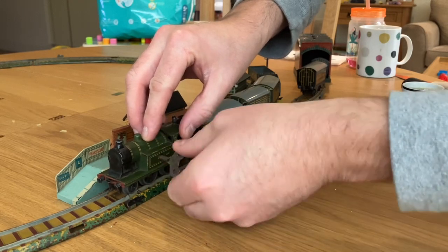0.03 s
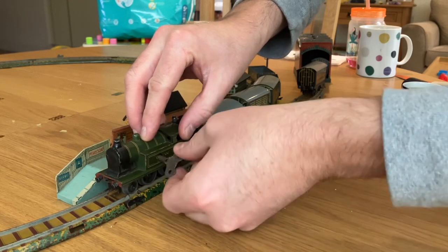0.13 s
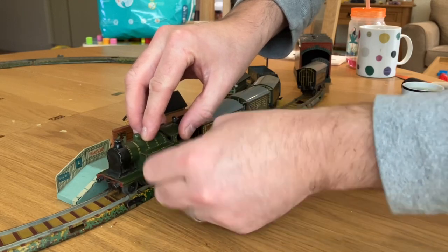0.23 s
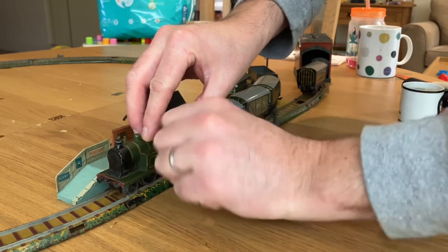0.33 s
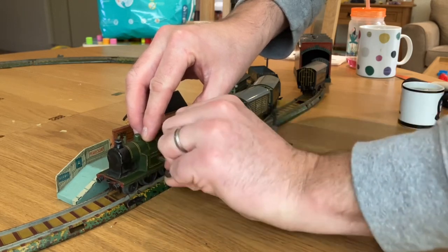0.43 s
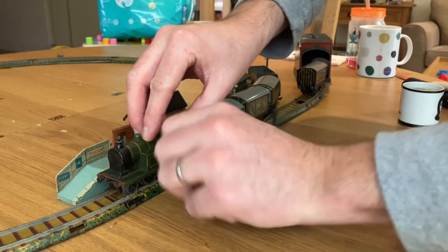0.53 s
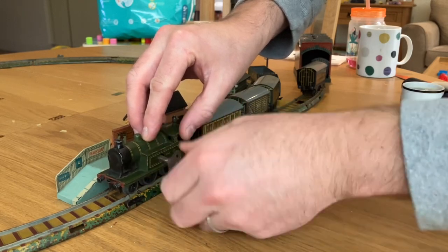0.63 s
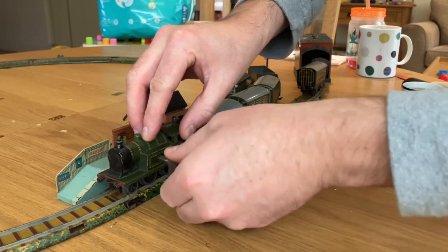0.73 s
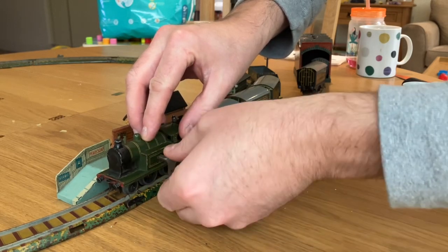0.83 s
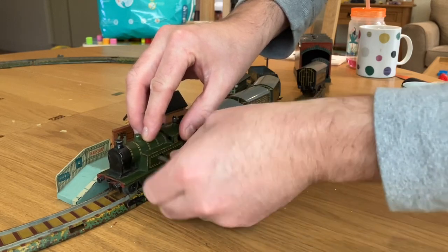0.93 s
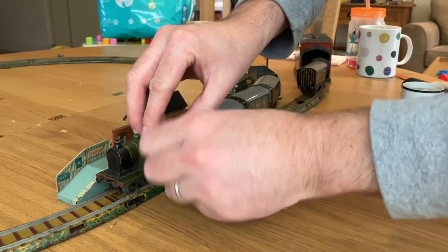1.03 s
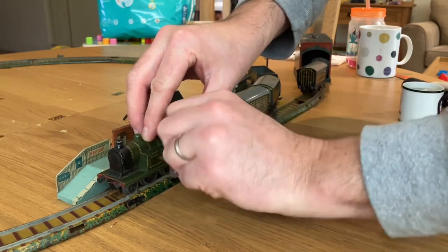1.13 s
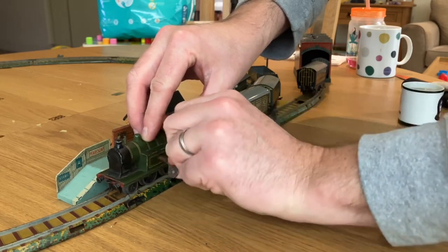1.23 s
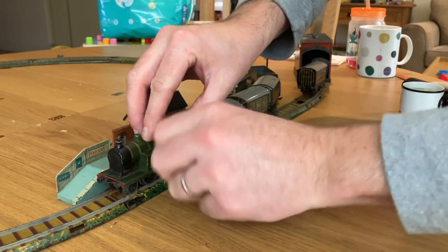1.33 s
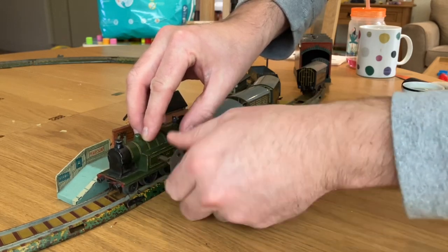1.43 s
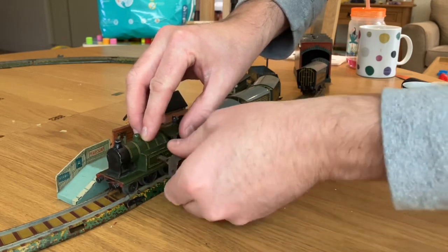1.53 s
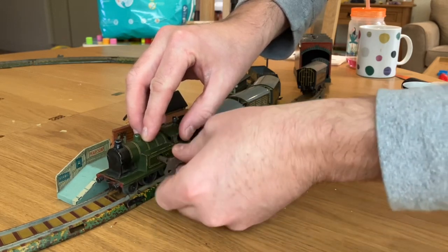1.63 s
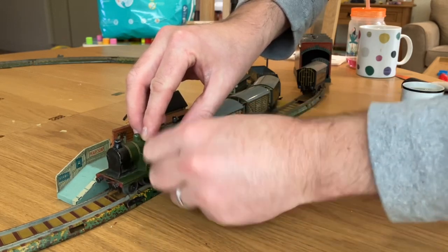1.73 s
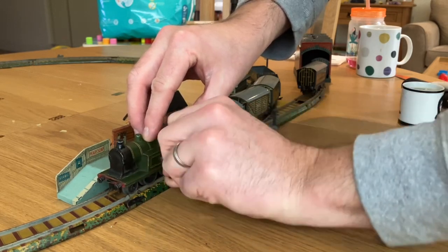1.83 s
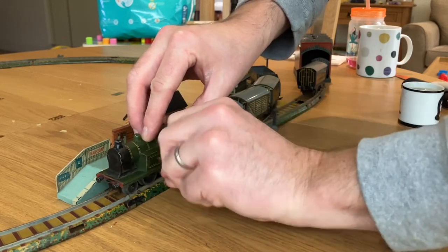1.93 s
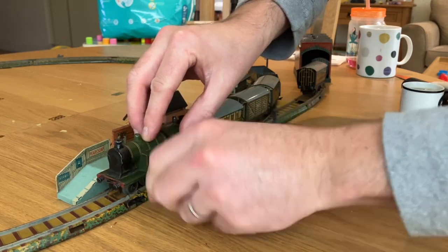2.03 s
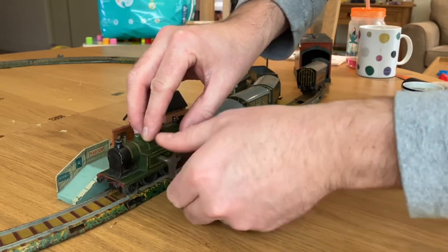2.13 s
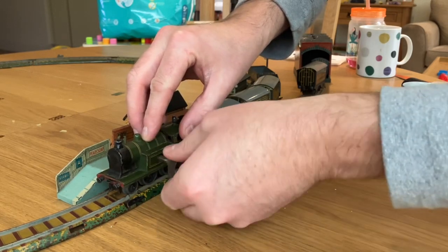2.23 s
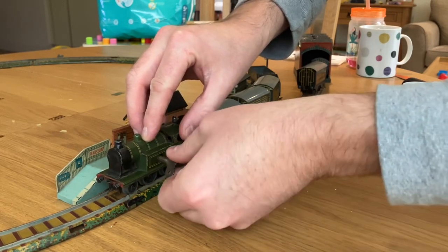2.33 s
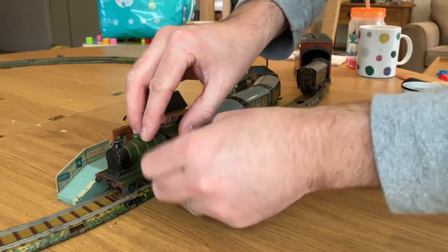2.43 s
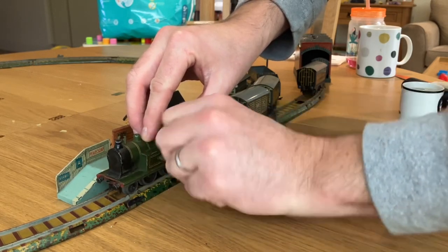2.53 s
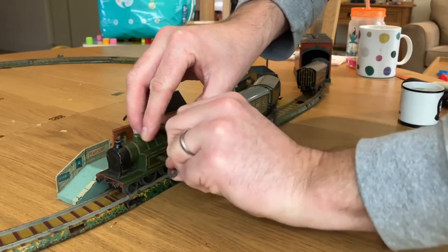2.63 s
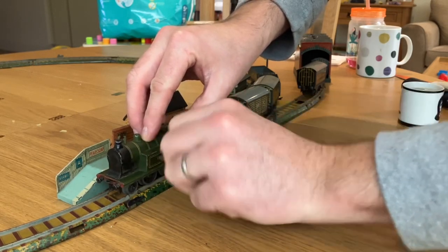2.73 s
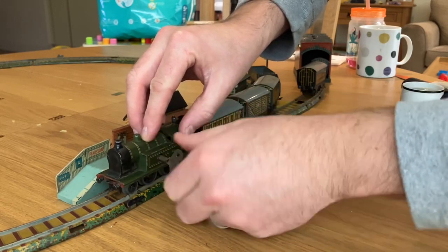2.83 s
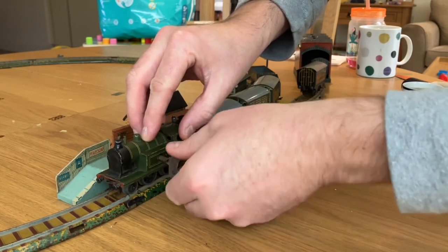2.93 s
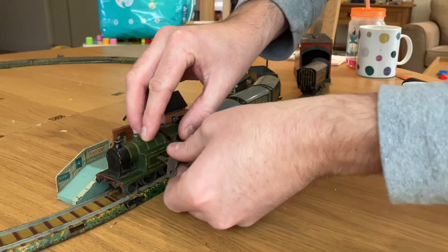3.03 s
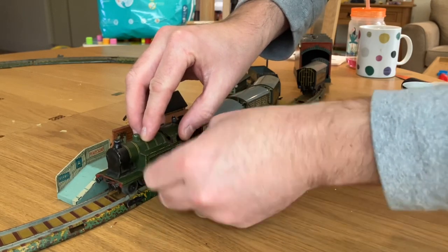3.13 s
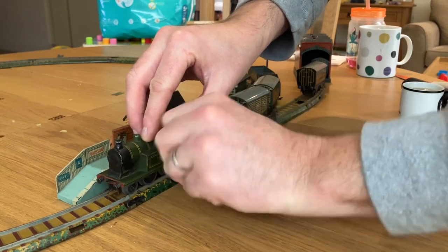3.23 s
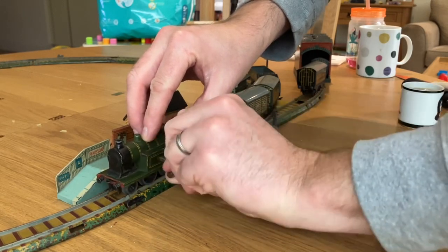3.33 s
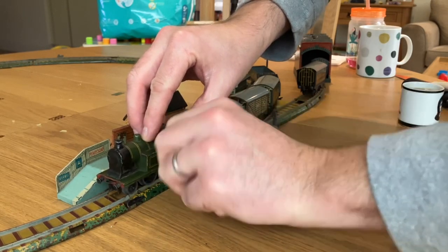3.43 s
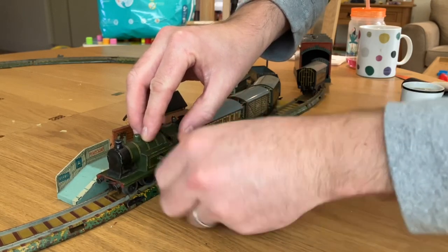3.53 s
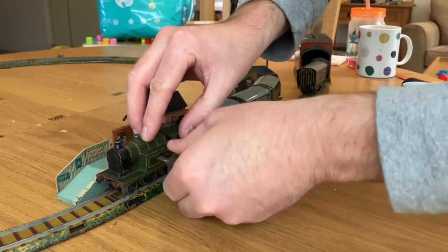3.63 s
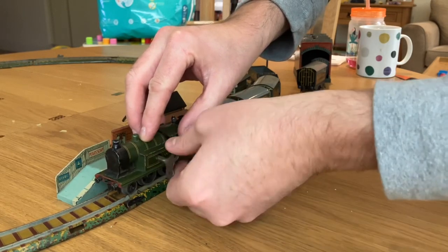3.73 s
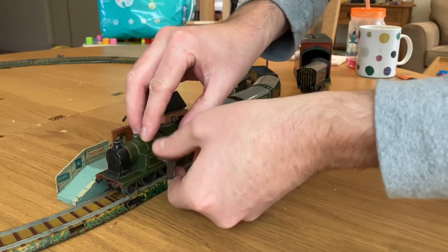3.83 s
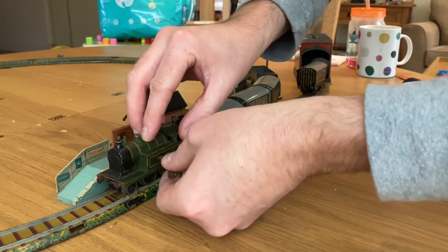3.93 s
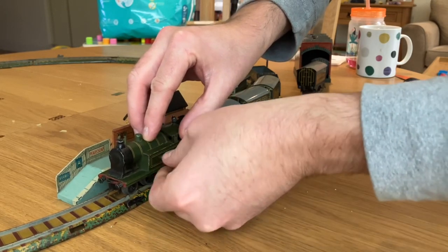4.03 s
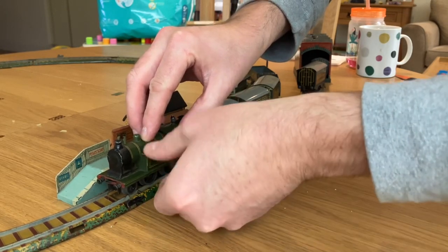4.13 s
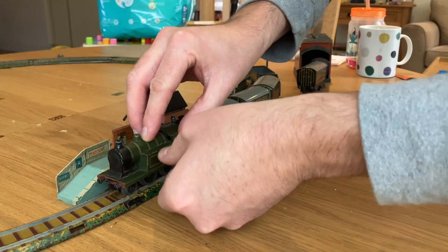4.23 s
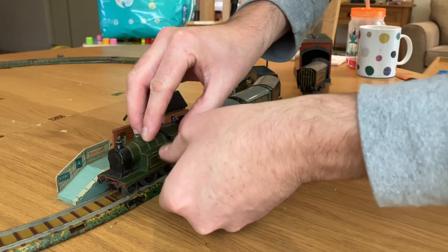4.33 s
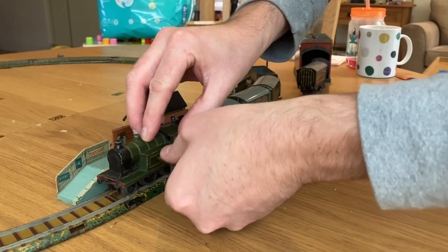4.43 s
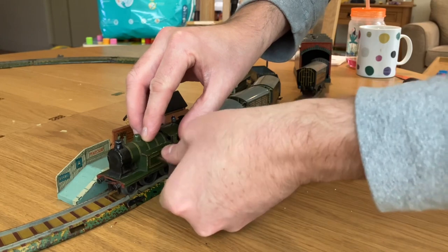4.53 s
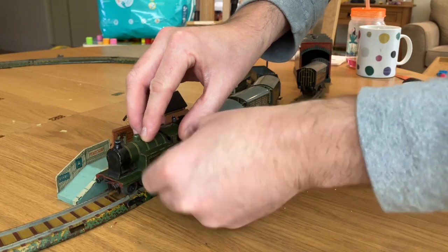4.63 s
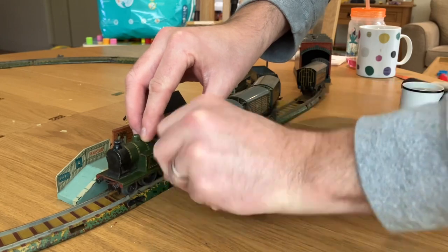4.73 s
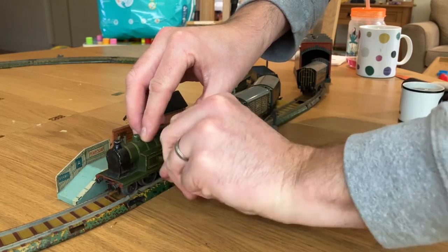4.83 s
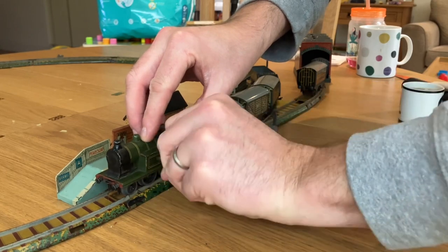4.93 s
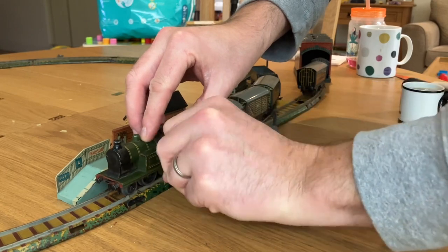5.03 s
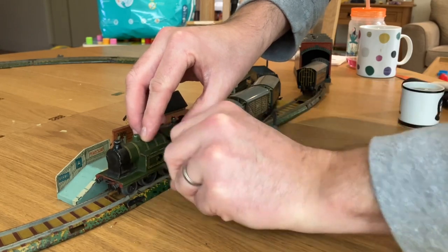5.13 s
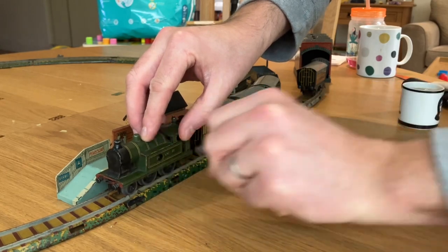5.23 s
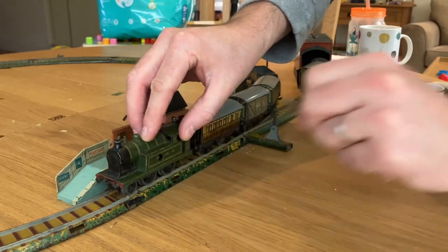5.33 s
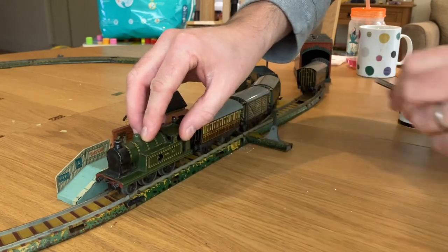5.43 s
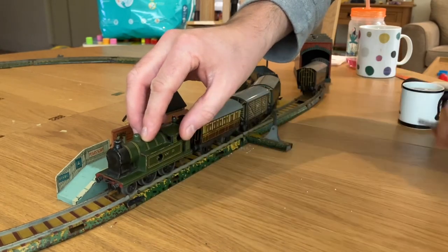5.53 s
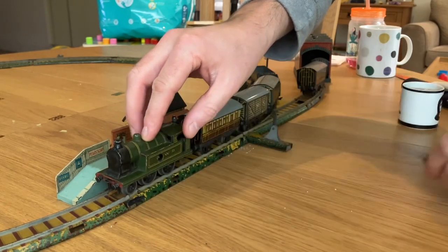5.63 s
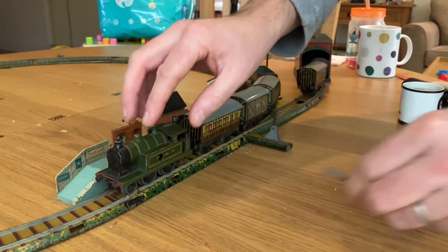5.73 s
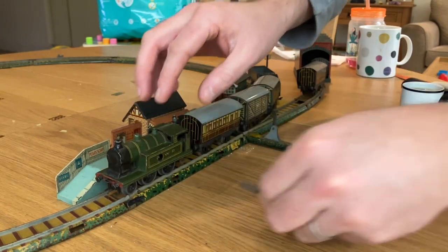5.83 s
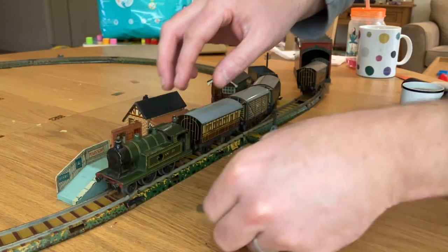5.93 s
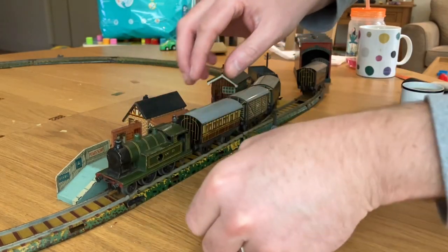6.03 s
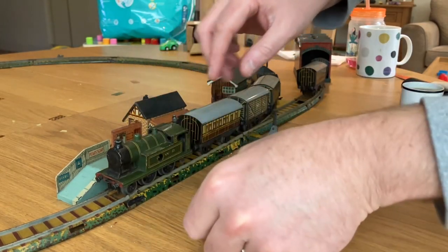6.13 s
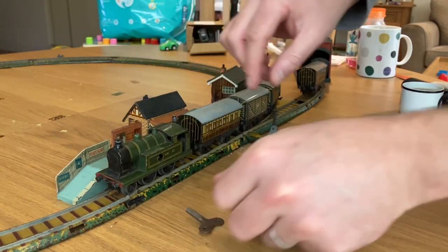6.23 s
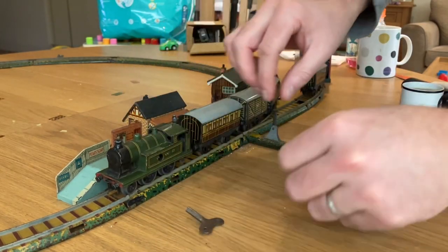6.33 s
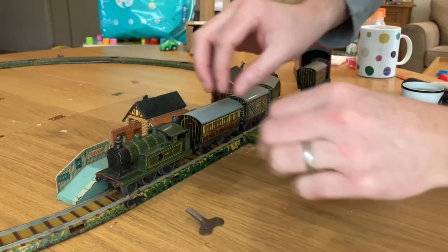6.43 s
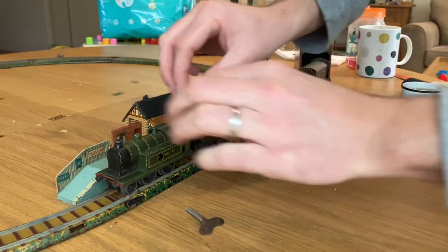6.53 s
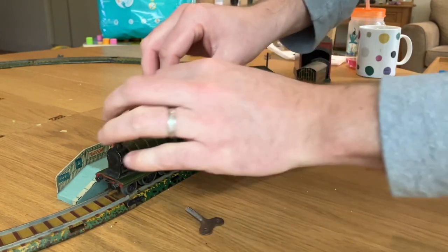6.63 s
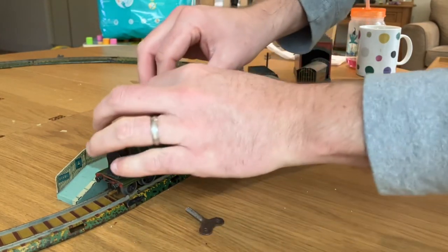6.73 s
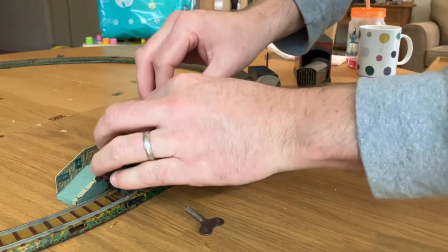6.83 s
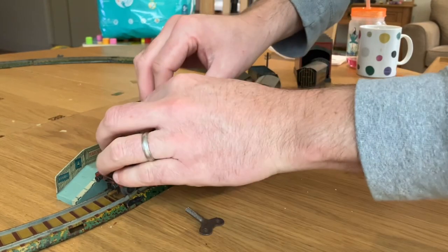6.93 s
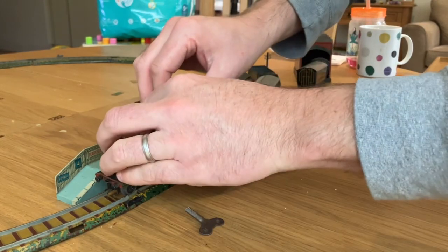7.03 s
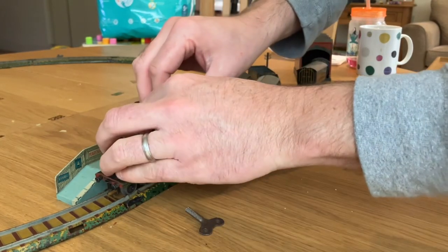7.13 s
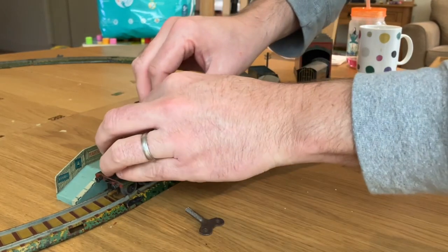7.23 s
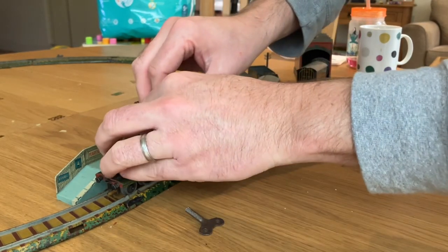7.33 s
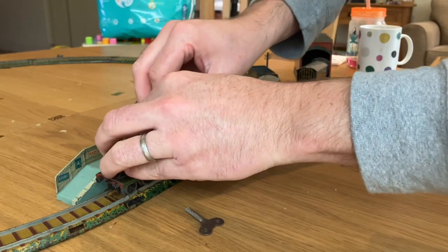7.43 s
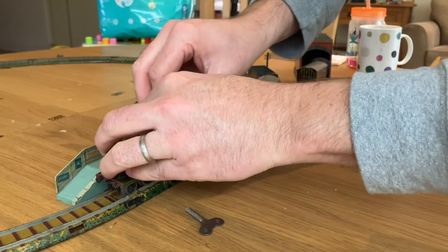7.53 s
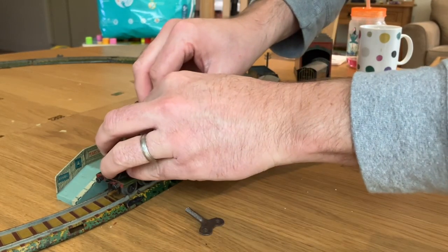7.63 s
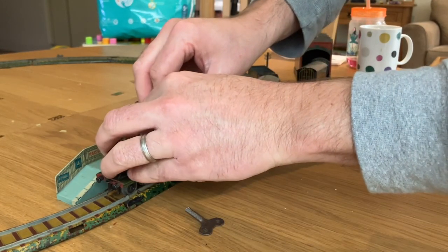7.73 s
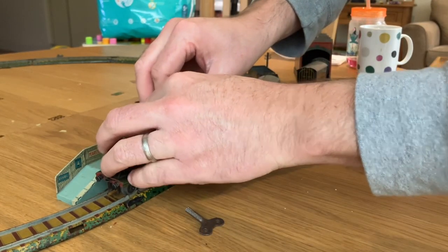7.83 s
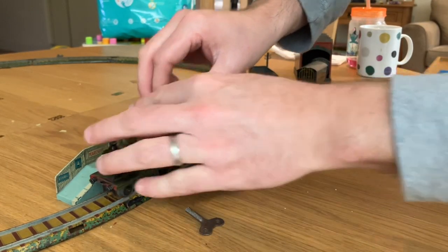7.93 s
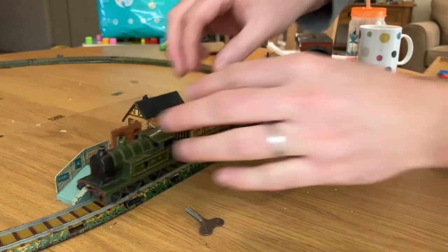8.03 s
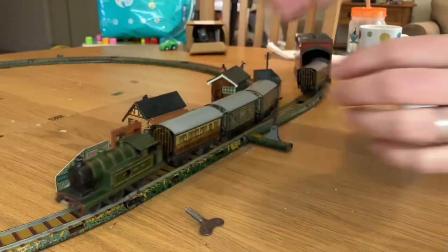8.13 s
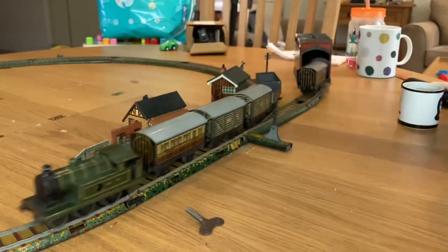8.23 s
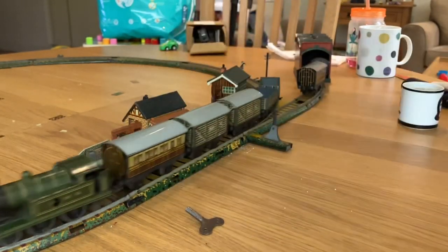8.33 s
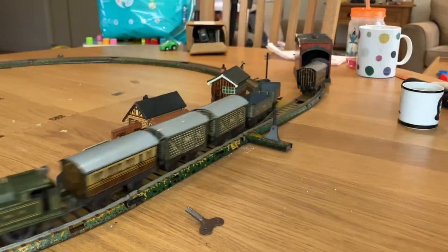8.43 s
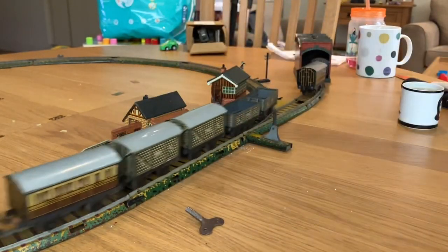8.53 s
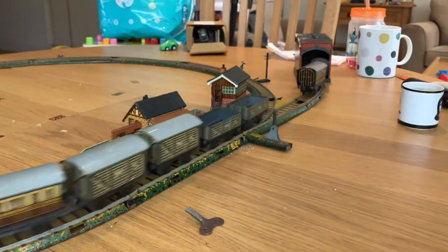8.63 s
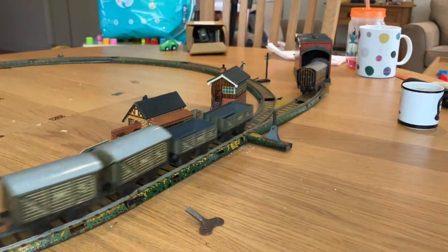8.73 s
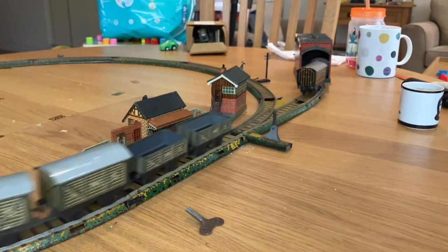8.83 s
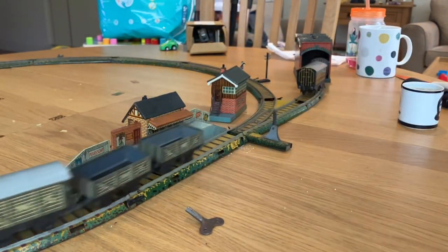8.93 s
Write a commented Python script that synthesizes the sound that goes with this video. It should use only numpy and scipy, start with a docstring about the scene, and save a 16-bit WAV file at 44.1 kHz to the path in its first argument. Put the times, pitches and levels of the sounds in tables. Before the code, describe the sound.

A tin clockwork toy train is wound on a wooden table, heard close in a quiet room. From 0.2 to 3.4 seconds come five evenly paced turns of the key, each a quick run of four bright, sharp ratchet clicks, with small tin knocks and hollow table bumps between. Around 3.6 to 4.3 seconds fingers rub faintly on the metal and the wheels scrape the rail. A sixth turn clicks at about 4.6 seconds. The key slides out with a short scrape at 5.1 seconds, then drops at 6 seconds, bouncing on the wood with a light ring. Soft handling follows, with a knock at 7.4 seconds. Near 7.9 seconds the brake lever clicks and the train starts moving. Its gears whirr and its wheels clatter on the tin track over a low table rumble, growing faster and louder until about 9 seconds.

```python
"""On a wooden table in a quiet living room, a tin clockwork engine is wound up with six turns of its key.
In each turn a steel catch (the pawl) snaps over four teeth, with small knocks and rubs in between.
The key is pulled out and dropped ringing on the table, and the brake lever is pushed. The train
gathers speed and grows louder, its gears whirring and its wheels clattering on the tin track."""
import sys
import numpy as np
from scipy import signal
from scipy.fft import rfft, irfft, next_fast_len
from scipy.io import wavfile

SR = 44100
rng = np.random.default_rng(int(sys.argv[2]) if len(sys.argv) > 2 else 0)


def to_wav(s):
    """Save 16-bit WAV."""
    ch = np.atleast_2d(s).T  # columns
    pcm = np.round(np.clip(ch, -1, 1) * 32767)  # PCM
    wavfile.write(sys.argv[1], SR, pcm.astype(np.int16))


N = 396459
TIME = np.arange(N) / SR
BRAKE_OFF_S, CUTOFF_HZ = 7.86, 16300
TOUCH_RISE_S, TOUCH_T60_S = 0.0012, 0.016   # a light metal touch; t60 is the time to fade by 60 dB


def from_db(db):
    """Turn decibels into a number to multiply a sound by."""
    return 10 ** (np.asarray(db) / 20)


def ramp(start_s, length_s):
    """Rise steadily from 0 to 1, then stay there."""
    return np.clip((TIME - start_s) / length_s, 0, 1)


def in_time(points):
    """Join points in time with straight lines, giving a value for every sample."""
    return np.interp(TIME, *np.transpose(points))


def at_hz(points, hz):
    """Read a curve between its points, with every octave equally wide."""
    pitch_hz, value = np.transpose(points)
    return np.interp(np.log(hz + 1), np.log(pitch_hz), value)


def white():
    """Two unrelated channels of plain hiss."""
    return rng.standard_normal((2, N))


def through(x, response):
    """Pass a sound through something whose answer to one click is `response`."""
    return signal.oaconvolve(x, np.atleast_2d(response), axes=1)[:, :N]


def colour(x, spectrum, keep_power=True, size=4096):
    """Make some pitches louder and others softer, with a filter that never sounds early (minimum phase)."""
    gains = from_db(at_hz(spectrum, np.fft.rfftfreq(size, 1 / SR)))
    cepstrum = irfft(np.log(gains))
    cepstrum[1:size // 2] *= 2
    cepstrum[size // 2 + 1:] = 0
    response = irfft(np.exp(rfft(cepstrum)))
    return through(x, response / np.linalg.norm(response) if keep_power else response)


def ring(x, modes):
    """A shaken object rings with its own fading tones, called modes."""
    t = TIME[:SR // 2]
    response = sum((-1) ** k * from_db(db - 60 * t / t60) / np.sqrt(t60) * np.sin(2 * np.pi * hz * t)
                   for k, (hz, db, t60) in enumerate(modes))
    return through(x, response / np.linalg.norm(response))


def struck_spot(count=36, spread_db=6.5):
    """Each spot that is struck favours some pitches and weakens others."""
    return np.transpose([np.geomspace(500, CUTOFF_HZ, count), spread_db * rng.uniform(-1, 1, count)])


def contacts(times, levels_db, rise_s, t60, uneven=False, size=3000):
    """Each contact is a short burst of tiny impacts; uneven ones land on a new spot every time."""
    t, out = TIME[:size], np.zeros((2, N + size))
    envelope = (1 - np.exp(-(t / rise_s) ** 2)) * from_db(-60 * t / t60)
    bursts = rng.standard_normal((len(times), 2, size)) * envelope
    for s, db, burst in zip(times, levels_db, bursts):
        burst = burst / np.linalg.norm(burst, axis=1, keepdims=True)
        if uneven:
            burst = colour(burst, struck_spot())[:, :size]
        start = int(s * SR)
        out[:, start:start + size] += from_db(db) * burst
    return out[:, :N]


def blows(times, levels_db, modes, spread_db):
    """Clean blows set an object ringing, each with a slightly different mix of its tones."""
    out, at = np.zeros((2, N)), (times * SR).astype(int)
    for hz, db, t60 in modes:
        strengths = from_db(levels_db[:, None] + db + spread_db * rng.standard_normal((len(at), 2)))
        clicks = np.full((2, N), 1e-18)
        clicks[:, at] = (strengths * rng.choice([-1, 1], (len(at), 2))).T
        decay, step = from_db(-60 / (t60 * SR)), 2 * np.pi * hz / SR
        out += signal.lfilter([0, np.sin(step)], [1, -2 * decay * np.cos(step), decay * decay], clicks)
    return out


def grains(per_s, spread_db):
    """Tiny impacts at random times and of uneven size, scaled to an average power of 1."""
    sizes = from_db(spread_db * np.minimum(rng.exponential(1, N), 4))
    impacts = (rng.random(N) < per_s / SR) * sizes * rng.choice([-1, 1], (2, N))
    return impacts / np.sqrt(np.mean(impacts ** 2) + 1e-20)


def thin_tin(x, t60, share):
    """Thin tin answers each impact with a dying shimmer of very many close tones."""
    decay = from_db(-120 / (t60 * SR))
    shimmer = np.sqrt(signal.lfilter([1 - decay], [1, -decay], x ** 2 + 1e-18)) * white()
    return (x + share * shimmer) / np.hypot(1, share)


# the room's own noise: pitch_hz, level_db
ROOM_NOISE = [(25, -16.5), (50, 1.5), (110, 0.5), (300, -11), (650, -29.5), (1200, -19), (3500, -18),
              (6000, -29), (16000, -39)]
def room_tone():
    """A faint, steady rumble and hiss fills the room."""
    return from_db(-65.5) * colour(white(), ROOM_NOISE)


# the echo compared with the direct sound: pitch_hz, level_db
ECHO_COLOUR = [(60, -3), (200, 0), (1500, -5), (3000, -5), (6000, -9), (12500, -16.5)]
def room_echo(x, t60=0.49, rise_s=0.0023):
    """Reflections blur into one tail that builds up quickly and dies away."""
    t = TIME[:SR]
    tail = rng.standard_normal((2, SR)) * from_db(-60 * t / t60) * (1 - np.exp(-(t / rise_s) ** 2))
    tail /= np.linalg.norm(tail, axis=1, keepdims=True)
    return colour(through(x, tail), ECHO_COLOUR, keep_power=False)


# how alike the two microphones sound: pitch_hz, likeness_0_to_1
MIC_LIKENESS = [(100, 0.94), (1500, 0.44), (4800, 0.046), (7200, 0.58), (9000, 1)]
# how much louder the left one is: pitch_hz, level_db
LEFT_LOUDER = [(600, 4), (1400, 1), (2800, 3.5), (5000, 0)]
# how far the wave is ahead on the left: pitch_hz, lead_radians
LEFT_AHEAD = [(0, 0), (1380, .45), (2700, 3.2), (3620, 1.6), (5400, 3.9), (6400, .3), (9200, -3.14),
              (13700, -9.42), (16000, -12.6)]
def microphones(field):
    """Two microphones share the first channel and hear the second with opposite signs."""
    size = next_fast_len(N + SR // 10)
    hz, sides = np.fft.rfftfreq(size, 1 / SR), np.array([[1], [-1]])
    shared, opposed = rfft(field, size)
    alike = np.clip(at_hz(MIC_LIKENESS, hz), 0, 1)
    pair = np.sqrt((1 + alike) / 2) * shared + sides * np.sqrt((1 - alike) / 2) * opposed
    balance = from_db(sides * at_hz(LEFT_LOUDER, hz) / 2)
    lead = np.interp(hz, *np.transpose(LEFT_AHEAD))
    return irfft(pair * balance * np.exp(0.5j * sides * lead), size)[:, :N]


# the table's rumble: pitch_hz, level_db
RUMBLE_COLOUR = [(25, -31.5), (70, -7), (112, 4.5), (350, -4.5), (800, -10.5), (1600, -26)]
def table_rumble():
    """The table top rumbles under a hand or rolling wheels."""
    return colour(white(), RUMBLE_COLOUR)


# the fingers shift their hold: middle_s, length_s, level_db
FINGER_SHIFTS = [(3.727, 0.42, -67), (4.033, 0.51, -63.5), (5.318, 0.29, -68), (5.58, 0.28, -71),
                 (6.975, 0.53, -69)]
# skin rubbing on tin: pitch_hz, level_db
RUB_COLOUR = [(300, -9.5), (700, -15), (1150, 2), (2000, -7.5), (3500, -4), (5000, -12), (16000, -27)]
def handling(hold_db=-68.5, idle_db=-75.5):
    """The held tin creaks and the table rumbles; each shift of the fingers is a swell of gritty rubbing."""
    hold = from_db(idle_db) + from_db(hold_db) * (1 - ramp(start_s=3.1, length_s=3.06))
    shift = sum(from_db(db) * np.sin(np.pi * ramp(s - length / 2, length)) ** 2
                for s, length, db in FINGER_SHIFTS)
    creaks = hold * thin_tin(grains(per_s=60, spread_db=2.5), t60=0.025, share=1.7)
    rubs = shift * thin_tin(grains(per_s=130, spread_db=3.5), t60=0.02, share=1)
    return colour(creaks + rubs, RUB_COLOUR) + (hold + shift) * from_db(-5) * table_rumble()


# the held engine slips on the rail: start_s, level_db
WHEEL_SLIPS = [(3.662, -48), (4.038, -45.5), (4.075, -50), (4.117, -47.5)]
# the crunch of a slip: pitch_hz, level_db
CRUNCH_COLOUR = [(200, -3.5), (700, -9.5), (1300, -3), (2000, -7.5), (3000, -19), (9000, -29.5)]
def wheel_scrapes(t60=0.17):
    """The wheels slip on the rail in a short crunch of uneven catches."""
    slip = sum(from_db(db) * (TIME > s) * from_db(-60 * np.maximum(TIME - s, 0) / t60)
               for s, db in WHEEL_SLIPS)
    return colour(slip * grains(per_s=700, spread_db=-0.5), CRUNCH_COLOUR)


# the table top's low tones: pitch_hz, level_db, t60_s
TABLE_TONES = [(68, -2.5, .2), (98.4, -6, 0.18), (116, 0, .24), (139, -6, 0.12), (196, -11, 0.14)]
# the force of a soft push: pitch_hz, level_db
PUSH_COLOUR = [(30, -15), (110, 1), (400, -8)]
def table_boom(times, levels_db):
    """The table top rings low; a soft push stirs its deepest and highest tones least."""
    return colour(blows(times, levels_db, TABLE_TONES, spread_db=2.5), PUSH_COLOUR, keep_power=False)


# a knock on the wood: pitch_hz, level_db
HOLLOW_COLOUR = [(100, -16), (190, 3), (450, -5), (800, -25.5), (2000, -20.5)]
def hollow_knock(times, levels_db):
    """The engine knocks hollowly against the table top."""
    return colour(contacts(times, levels_db, rise_s=0.0002, t60=0.086), HOLLOW_COLOUR)


# the engine bumps the table: start_s, boom_db, knock_db
TABLE_BUMPS = [(0.502, -47, -17.5), (0.646, -48, -38), (1.955, -49.5, -23.5), (2.841, -44.5, -21.5),
               (3.437, -43, -24.5), (3.563, -49, -23.5), (4.072, -49.5, -34), (4.665, -48, -14.5),
               (7.372, -39, -17.5)]
def table_bumps():
    """The table top booms and knocks under the rocking engine."""
    s, boom_db, knock_db = np.transpose(TABLE_BUMPS)
    return table_boom(s, boom_db) + hollow_knock(s, knock_db)


# a small metal tick: pitch_hz, level_db
TICK_COLOUR = [(700, -27.5), (1300, -0.5), (2200, -3), (3500, 2.5), (4700, -2), (7200, 1), (16000, -7)]
def gear_grit(per_snap=7, level_db=-21.5):
    """Gear teeth and coils of the tightening spring catch and slip in small clicks around every snap."""
    s = np.ravel(np.array(PAWL_SNAPS)[:, :1] + rng.uniform(-0.03, 0.04, (len(PAWL_SNAPS), per_snap)))
    levels_db = level_db + 6 * rng.uniform(-1, 1, len(s))
    return colour(contacts(s, levels_db, TOUCH_RISE_S, TOUCH_T60_S, uneven=True), TICK_COLOUR)


# the pawl settles further: start_s, level_db
SETTLING_TICKS = [(.542, -20.5), (1.95, -26), (2.074, -20.5), (3.42, -19.5)]
def pawl_settling():
    """The pawl alone gives a faint, bright tick as it settles."""
    s, db = np.transpose(SETTLING_TICKS)
    return colour(contacts(s, db, rise_s=0.00092, t60=0.0181), SNAP_COLOUR)


# the key is gripped to begin a turn: start_s, strength_db
KEY_GRIPS = [(0.0965, -6.5), (0.8681, 8), (1.5586, -7), (2.295, 1.5), (3.032, -0.5), (4.5274, 2)]
# the key is let go to end a turn: start_s, strength_db
KEY_RELEASES = [(0.475, 1.5), (1.2215, 2), (1.918, 4), (2.656, -7), (3.392, 4.5), (4.886, -8)]
def winding_knocks(snaps_per_turn=4):
    """List the three small knocks of each turn as rows of start_s, body_db, tick_db."""
    rows, first_snaps = [], PAWL_SNAPS[::snaps_per_turn]
    for (grip_s, grip_db), (free_s, free_db), (snap_s, _, _) in zip(KEY_GRIPS, KEY_RELEASES, first_snaps):
        rows += [(grip_s, grip_db - 24.5, grip_db / 2 - 8.5),   # the key takes up its slack
                 (snap_s - 0.031, -19, -25),   # the gears take the load
                 (free_s, free_db - 17.5, free_db / 2 - 10.5)]   # the spring settles on the pawl
    return rows


# single knocks of wheels, couplings and brake lever, and of the key first touching the wood at 5.99 s: start_s,
# body_db, tick_db
LOOSE_KNOCKS = [(0.5072, -9, -9.5), (3.631, -38.5, -26.5), (3.728, -19, -30), (3.911, -13.5, -10.5),
                (4.066, -21, -24), (4.167, -12, -30), (4.384, -20, -27), (5.2033, -19.5, -40),
                (5.4856, -14.5, -42), (5.646, -22, -30), (5.9945, -12.5, -43), (6.527, -29.5, -49),
                (6.748, -39, -43), (6.836, -32, -39), (7.3148, -13.5, -34), (7.358, -15, -18),
                (7.3853, -8.5, -24), (7.7889, -15.5, -55), (7.867, -9, -17.5), (7.977, -13.5, -15),
                (8.016, -15, -9.5)]
# the tin body's tones: pitch_hz, level_db, t60_s
TIN_TONES = [(984, -4, 0.049), (1291, -2, 0.022), (1612, 2.5, 0.022), (1826, -3, 0.035), (2174, 1.5, 0.012),
             (2810, 6.5, 0.0038), (3100, 3.5, 0.02), (3345, 2.5, 0.016), (4066, -2.5, 0.039)]
# fingers muffle the treble: pitch_hz, level_db
FINGER_MUFFLING = [(1700, 1), (3500, -9), (6000, -15.5)]
def tin_knocks(held_t60_s=0.018, rebound_s=0.014):
    """Loose parts knock the tin body, muffled by the hand, with a dry tick that bounces once."""
    s, body_db, tick_db = np.transpose(winding_knocks() + LOOSE_KNOCKS)
    touch = contacts(s, body_db, TOUCH_RISE_S, TOUCH_T60_S)
    held_tones = [(hz, db, min(t60, held_t60_s)) for hz, db, t60 in TIN_TONES]
    body = ring(touch, held_tones) + from_db(-7.5) * colour(touch, CLACK_COLOUR)
    tick = contacts(s, tick_db, rise_s=0.0034, t60=0.024, uneven=True)
    rebound = contacts(s + rebound_s, tick_db - 11, TOUCH_RISE_S, TOUCH_T60_S, uneven=True)
    return colour(body, FINGER_MUFFLING, keep_power=False) + colour(tick + rebound, TICK_COLOUR)


# the key slides off its shaft: time_s, level_db
SLIDE_LEVELS = [(5.04, -103), (5.07, -42.5), (5.097, -38.5), (5.13, -103)]
# the dropped key bounces: start_s, clack_db, ring_db
KEY_BOUNCES = [(5.9944, -26.5, -72), (6.077, -11.5, -30), (6.082, -13, -50), (6.105, -15, -60),
               (6.1229, -12, -21.5), (6.1499, -14, -24), (6.1666, -12.5, -41), (6.2249, -19, -39),
               (6.383, -28.5, -75)]
# a hard clack: pitch_hz, level_db
CLACK_COLOUR = [(100, -18.5), (250, -1.5), (900, -5.5), (3000, 3), (6000, -7), (16000, -21)]
# short ringing tones as the dropped key lands: pitch_hz, level_db
KEY_LANDING_TONES = [(824, -1.5), (888, 4), (984, 0), (1171, 0.5), (1245, 2), (2070, 1), (2226, 1.5),
                     (2337, -1), (3046, 0)]
# the key's own tone: pitch_hz, level_db, t60_s
KEY_TONE = [(7007, -7, 0.12)]
def dropped_key(landing_t60_s=0.09):
    """The key scrapes off its shaft, then clacks and skitters on the table and rings."""
    slide = from_db(in_time(SLIDE_LEVELS)) * colour(grains(per_s=1600, spread_db=-10.5), TICK_COLOUR)
    s, clack_db, ring_db = np.transpose(KEY_BOUNCES)
    strike = contacts(s, clack_db + 2.5, rise_s=0.00029, t60=0.0026)
    skitter = contacts(s, clack_db + 2.5, rise_s=0.00065, t60=0.055, uneven=True)
    landing_tones = [(hz, db, landing_t60_s) for hz, db in KEY_LANDING_TONES]
    ringing = blows(s, clack_db - 31.5, landing_tones, spread_db=2)
    tone = blows(s, ring_db, KEY_TONE, spread_db=1)
    return slide + colour(strike + skitter, CLACK_COLOUR) + ringing + tone


# how hard the running engine works, as loudness: time_s, level_db
ENGINE_EFFORT = [(7.88, -54.5), (7.95, -61), (8.024, -50), (8.08, -53), (8.172, -40.5), (8.464, -34),
                 (8.986, -29)]
def engine_state(cruise_db=-31, spin_up_s=0.18, governor_turns_per_s=36.4):
    """With the brake off the engine speeds up, and so does its governor, a spinning speed limiter."""
    effort_db = in_time(ENGINE_EFFORT) - cruise_db
    firm_rail = ramp(start_s=8.66, length_s=0.15)   # it rolls on to a rail lying firmly on the table
    speed = 1 - np.exp(-np.maximum(TIME - BRAKE_OFF_S, 0) / spin_up_s)
    governor_angle = 2 * np.pi * governor_turns_per_s * np.cumsum(speed) / SR
    return effort_db, firm_rail, speed, governor_angle


# the governor's hum: cycles_per_turn, level_db
GOVERNOR_TONES = [(2, -3), (6, -20)]
def table_hum():
    """The table top drones under the wheels and hums with the governor; firm rail makes it hum more."""
    effort_db, firm_rail, speed, angle = engine_state()
    tones = sum(from_db(db) * np.sin(round(cycles) * angle + 2 * np.pi * rng.random())
                for cycles, db in GOVERNOR_TONES)
    drone = from_db(-48.5 + 0.32 * effort_db) * ring(white(), TABLE_TONES)
    hum = from_db(-48.5 + 0.58 * effort_db + 13 * firm_rail) * tones
    return np.sqrt(speed) * drone + speed * hum * [[1], [0]]   # both microphones share the hum


# the running train lurches: start_s, rail_db, body_db
TRAIN_LURCHES = [(8.465, -8, 2.5), (8.564, 0.5, -15), (8.728, 1, 1.5), (8.83, 1, 3), (8.918, -13, 2.5),
                 (8.956, -3, 6)]
# the ringing rails: pitch_hz, level_db
RAIL_COLOUR = [(400, -32), (780, -19.5), (1000, -9), (1250, -5), (2000, -13.5), (6000, -29.5)]
def lurches():
    """The train lurches over uneven track: each time the rail clangs and the tin body clatters."""
    s, rail_db, body_db = np.transpose(TRAIN_LURCHES)
    rail = contacts(s, rail_db, rise_s=0.004, t60=0.14, uneven=True)
    body = contacts(s, body_db, rise_s=0.0023, t60=0.083, uneven=True)
    return colour(rail, RAIL_COLOUR) + colour(body, RATTLE_COLOUR)


# the rattling tin body: pitch_hz, level_db
RATTLE_COLOUR = [(1200, -34), (2000, -3), (3350, 2), (4300, -0.5), (5500, -7), (9000, -53.5)]
def clatter(per_s=75, level_db=-14, spread_db=6):
    """Wheels and couplings knock at random as the train runs, each on another spot of the ringing tin."""
    at = np.flatnonzero((rng.random(N) < per_s / SR) & (TIME > BRAKE_OFF_S))
    effort_db = engine_state()[0]
    levels_db = level_db + effort_db[at] + spread_db * rng.uniform(-1, 1, len(at))
    knocks = contacts(TIME[at], levels_db, TOUCH_RISE_S, TOUCH_T60_S, uneven=True)
    return colour(ring(knocks, TIN_TONES), RATTLE_COLOUR)


# the spinning gears: pitch_hz, level_db
WHIRR_COLOUR = [(2000, -8), (5000, -1.5), (8000, 2.5), (11000, -1), (15600, -6)]
def running_train(rail_db=-33.5, rattle_db=-32.5, whirr_db=-28.5, rolling_db=-40.5):
    """Rails ring, the body rattles, gears whirr and wheels rumble, all louder as the engine works harder."""
    effort_db, firm_rail, speed, angle = engine_state()
    throb = from_db(np.sin(2 * angle) + 1.8 * np.sin(angle / 2))   # the governor and its slower gear
    jolts = grains(per_s=170, spread_db=2)   # the wheels shake rails and body together
    chatter = jolts + 1.49 * grains(per_s=790, spread_db=1)
    rail_gain = from_db(rail_db + 0.68 * effort_db - 5 * firm_rail)   # firm rail rings less
    rails = thin_tin(chatter, t60=0.174, share=2.1) * rail_gain
    rattle = thin_tin(throb * chatter, t60=0.043, share=3.5) * from_db(rattle_db + effort_db)
    whirr = thin_tin(throb * (0.37 * chatter + white()), t60=0.01, share=2.1) * from_db(whirr_db + effort_db)
    rolling = np.sqrt(speed) * from_db(rolling_db + 0.37 * effort_db) * table_rumble()
    metal = colour(rails, RAIL_COLOUR) + colour(rattle, RATTLE_COLOUR) + colour(whirr, WHIRR_COLOUR)
    return (TIME > BRAKE_OFF_S) * (metal + rolling)


# the pawl drops off a tooth, four times a turn: start_s, snap_db, body_db
PAWL_SNAPS = [(0.2014, 2, -5.5), (0.2542, 5.5, -12), (0.3023, 2.5, -10.5), (0.3614, 1, -12),
              (0.9457, -0.5, -4.5), (1.0087, 3.5, -7.5), (1.055, 2, -12), (1.1456, 2.5, -9.5),
              (1.6575, 1.5, -6.5), (1.7118, 0.5, -8), (1.7519, 2, -12.5), (1.8018, -0.5, -10),
              (2.391, 4, -9), (2.4514, -1, -5.5), (2.5036, 3, -13), (2.597, 4, -11.5), (3.1214, 3, -8),
              (3.1726, 1, -5.5), (3.215, 3, -9.5), (3.276, 3, -16.5), (4.6116, 4, -7.5), (4.6662, 1.5, -13),
              (4.7085, 2.5, -10.5), (4.798, 3, -15)]
# the bright steel snap: pitch_hz, level_db
SNAP_COLOUR = [(750, -26), (2000, -15), (5600, -15), (7400, -21), (9900, -1), (10700, -6), (12500, 1),
               (16300, -12)]
# a slack pawl also clacks, less as the spring tightens: time_s, level_db
SLACK_LEVELS = [(1.7, -1.5), (3.2, -7), (4.6, -14)]
# that lower clack: pitch_hz, level_db
SLACK_COLOUR = [(4500, -24.5), (6900, 0), (9000, -1), (12000, -18)]
def ratchet(rebound_s=0.014, rebound_db=-26):
    """The steel pawl snaps brightly, bounces twice, rings the tin body and shakes the table."""
    s, snap_db, body_db = np.transpose(PAWL_SNAPS)
    snap = contacts(s, snap_db, rise_s=0.00084, t60=0.007)
    snap += contacts(s, snap_db - 6, rise_s=0.00081, t60=0.0085, uneven=True)
    slack_db = np.interp(s, *np.transpose(SLACK_LEVELS))
    clack = contacts(s, slack_db, rise_s=0.00064, t60=0.017, uneven=True)
    gaps_s = rebound_s * rng.uniform(0.5, 1.5, (len(s), 2))
    bounce_s = np.ravel(s[:, None] + np.cumsum(gaps_s, axis=1))
    bounce_db = rebound_db + 2 * rng.standard_normal(len(bounce_s))
    bounces = contacts(bounce_s, bounce_db, rise_s=0.000624, t60=0.014, uneven=True)
    body = contacts(s, body_db, rise_s=0.0011, t60=0.028, uneven=True) + bounces
    steel = colour(snap + bounces, SNAP_COLOUR) + colour(clack, SLACK_COLOUR)
    table = table_boom(s, body_db - 38.5) + hollow_knock(s, body_db - 11)
    return steel + ring(body, TIN_TONES) + table


def scene():
    """Everything on the table reaches two microphones, along with the room's echo and noise."""
    winding = ratchet() + gear_grit() + pawl_settling()
    hands = tin_knocks() + table_bumps() + handling() + wheel_scrapes() + dropped_key()
    train = running_train() + clatter() + lurches()
    direct = winding + hands + train
    return microphones(direct + room_echo(direct) + table_hum() + room_tone())


def record(dry):
    """A steep filter cuts off the very highest treble."""
    return signal.sosfilt(signal.ellip(10, 0.1, 80, CUTOFF_HZ, fs=SR, output="sos"), dry)


dry = scene()
out = record(dry)
to_wav(out)
```